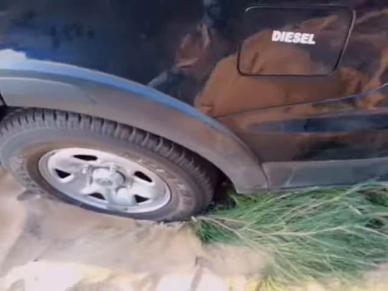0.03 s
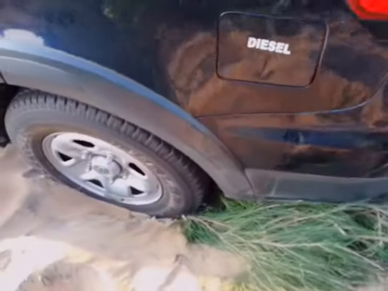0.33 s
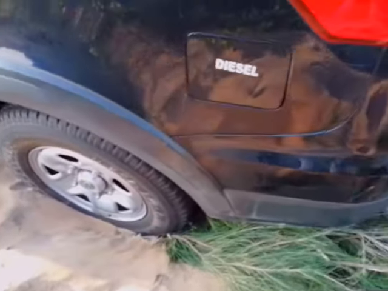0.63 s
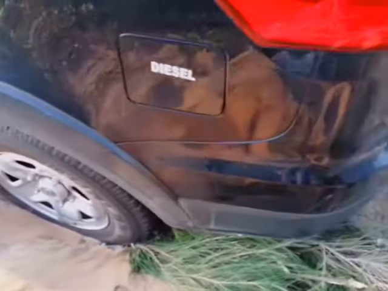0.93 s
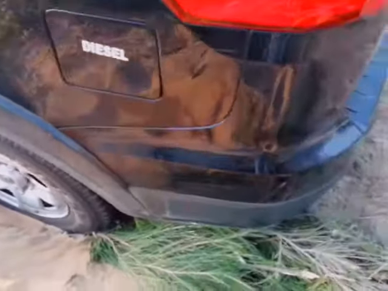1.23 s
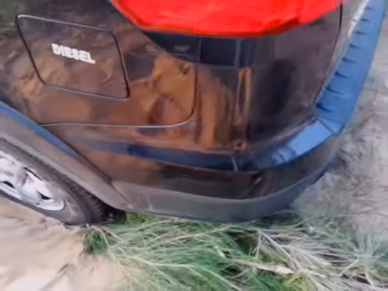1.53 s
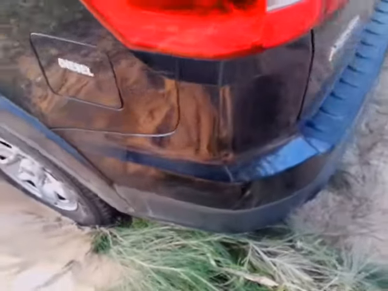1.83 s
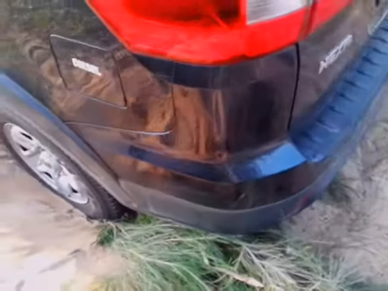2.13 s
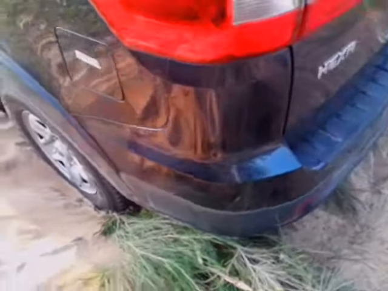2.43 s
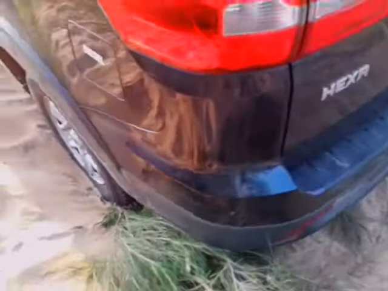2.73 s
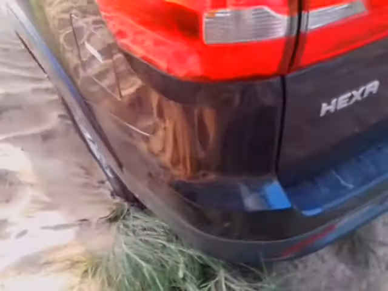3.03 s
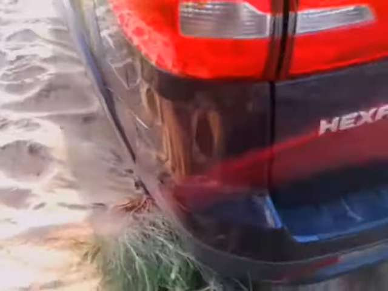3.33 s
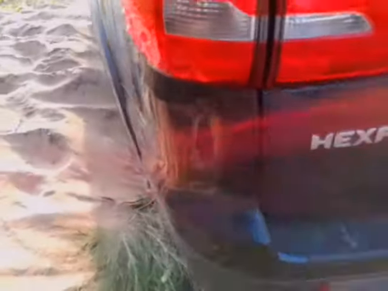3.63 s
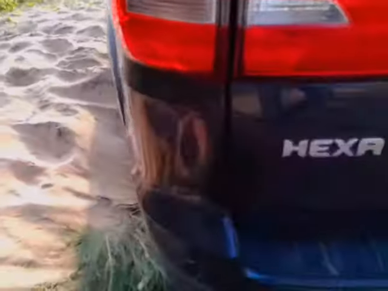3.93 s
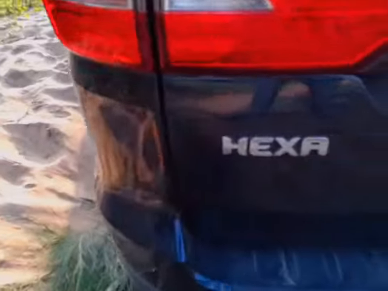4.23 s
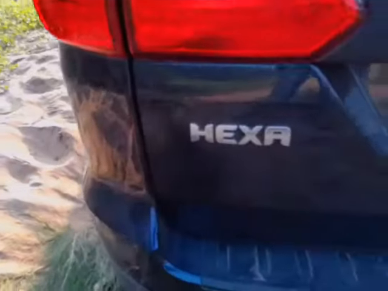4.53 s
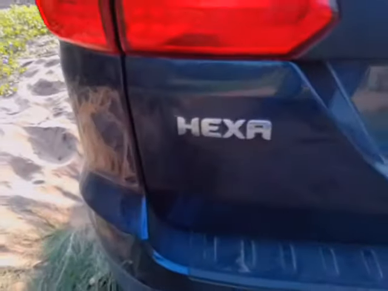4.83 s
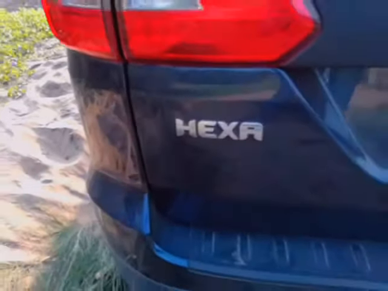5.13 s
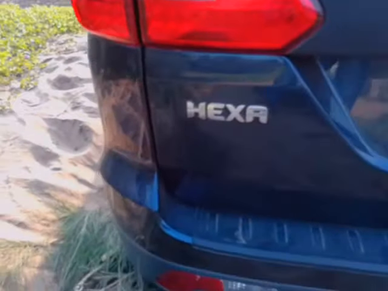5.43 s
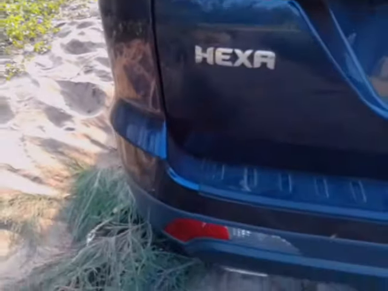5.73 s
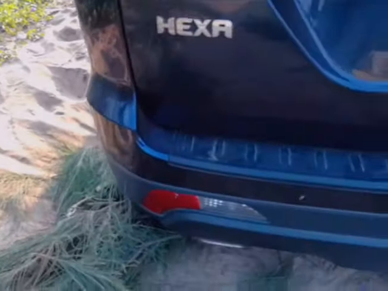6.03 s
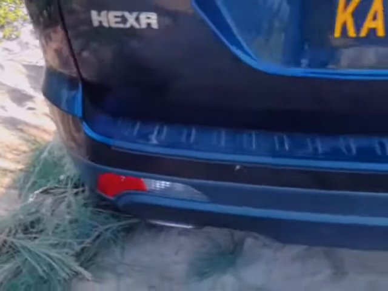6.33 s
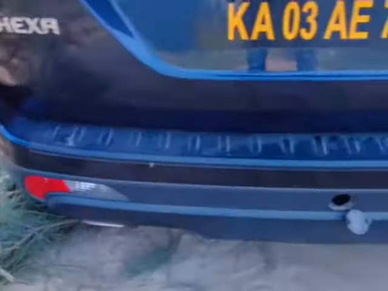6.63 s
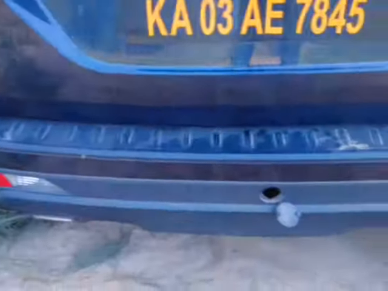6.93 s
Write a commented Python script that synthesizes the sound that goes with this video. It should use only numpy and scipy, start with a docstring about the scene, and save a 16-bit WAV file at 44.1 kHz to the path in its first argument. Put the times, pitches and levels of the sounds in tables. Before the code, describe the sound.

Wind buffets a hand-held microphone outdoors, rumbling and fluttering in uneven gusts with low pops, mostly on the left. It is strongest a little before halfway, eases, then swells again before dying down. Behind it, leaves hiss softly and high insects buzz. During the lull a small bird chatters faintly, while soft steps scuff sand and snap a few dry stems.

```python
"""On sand and grass beside a parked car, gusts buffet a hand-held phone carried slowly round it.
Turbulent pressure rumbles in the microphone ports and pops when eddies break over them; the hand adds
a deep rumble. Behind this, leaves hiss over a far roar, insect wings buzz in narrow resonant bands,
soft steps stir the sand and snap dry stems, distant birds call, and a small bird chatters in two
voices, one from each side of its syrinx."""
import sys
import numpy as np
from scipy import signal
from scipy.fft import rfft, irfft
from scipy.io import wavfile
from scipy.ndimage import uniform_filter1d

SR = 44100
rng = np.random.default_rng(int(sys.argv[2]) if len(sys.argv) > 2 else 0)


def pcm_store(signal):
    """Save signal as 16-bit PCM."""
    levels = np.round(np.clip(np.atleast_2d(signal), -1, 1) * 32767)
    wavfile.write(sys.argv[1], SR, levels.astype(np.int16).T)


N = 308700
TIME = np.arange(N) / SR
HZ = np.fft.rfftfreq(N, 1 / SR)

# Spectra are densities that set shape only; levels are relative, ahead of each function's own gains.
# Slow and fast turbulent pressure at a port: (frequency [Hz], level [dB])
RUMBLE_SPECTRUM = [(12, -41), (25, -1), (45, -3), (85, -0.5), (130, -1.5), (190, -6.5), (260, -15.5),
                   (400, -34), (800, -88)]
FLUTTER_SPECTRUM = [(90, -55), (170, -18), (230, -4.5), (320, -10.5), (450, -16.5), (700, -30), (1000, -54),
                    (1600, -63), (3000, -100)]
# Breeze between gusts: (time [s], rumble level [dB], flutter level [dB])
BREEZE = [(0, -42.5, -48), (.7, -48.5, -66), (1.1, -41.5, -57), (2.05, -45, -57), (3.2, -39, -52),
          (4.05, -47, -60), (4.5, -44.5, -63), (4.72, -48.5, -61), (6.25, -45, -60), (6.42, -52, -65),
          (7, -55.5, -65)]
# Gusts: (time [s], hold [s], rumble level [dB], flutter level [dB])
GUSTS = [(0, 0.053, -33, -34.5), (0.205, 0.022, -44, -64), (0.368, 0.0052, -35, -55),
         (0.428, 0.017, -36.5, -57), (0.576, 0.076, -34.5, -48.5), (0.762, 0.1, -35, -40.5),
         (1.018, 0.0077, -35, -65), (1.114, 0.016, -36.5, -58), (1.193, 0.066, -27, -34),
         (1.284, 0.14, -32, -42.5), (1.363, 0.0074, -26.5, -40), (1.47, 0.059, -24.5, -47),
         (1.558, 0.062, -29.5, -34.5), (1.83, 0.097, -41.5, -50.5), (2.171, 0.081, -34.5, -39.5),
         (2.296, 0.19, -29.5, -34), (2.472, 0.12, -26.5, -40), (2.628, 0.048, -21.5, -15),
         (2.727, 0.19, -23, -31), (2.924, 0.05, -29.5, -42), (3.005, 0.063, -30.5, -36.5),
         (3.09, 0.53, -39.5, -47), (3.542, 0.053, -42.5, -40), (3.825, 0.16, -40, -42),
         (4.106, 0.066, -41.5, -40.5), (4.345, 0.092, -38, -62), (4.55, 0.021, -54, -60),
         (4.791, 0.013, -29.5, -32.5), (4.868, 0.071, -28, -34.5), (4.992, 0.0081, -28, -34),
         (5.213, 0.1, -27, -33), (5.367, 0.026, -35.5, -41.5), (5.518, 0.022, -31.5, -43.5),
         (5.733, 0.045, -34.5, -37.5), (5.803, 0.089, -32, -33), (5.92, 0.097, -36.5, -39),
         (6.055, 0.035, -35, -51), (6.184, 0.095, -35.5, -43.5)]
# Share of the buffeting between the ports: (time [s], right minus left [dB])
PORT_BALANCE = [(0, -20), (.3, -8), (.8, -20), (1.28, -8), (1.38, 1), (1.48, -15), (2.05, -5.5), (2.3, -31),
                (2.7, -5), (2.88, -21), (3.14, 5.5), (3.4, -13), (4.15, -31), (4.5, -11), (5.0, -31),
                (6.2, -15), (6.5, -7), (7, -7)]
# Large eddies breaking over the left port: (time [s], peak level [dB], half-width [ms])
EDDIES = [(1.5039, -10.5, 0.44), (1.521, -14, 0.65), (1.5905, -20, 0.64), (2.2193, -25, 0.49),
          (2.2303, -9, 0.26), (2.2908, -17.5, 0.43), (2.3133, -17, 0.53), (2.363, -17, 0.47),
          (2.392, -19, 0.5), (2.4619, -27, 0.38), (2.5164, -23.5, 0.45), (2.562, -19.5, 0.88),
          (2.645, -9.5, 1.1), (2.668, -20, 0.48), (2.6744, -15, 0.4), (2.6794, -17, 0.42),
          (2.7356, -25.5, 0.27), (2.749, -13, 1.4), (2.798, -19, 0.56), (2.8311, -11, 0.69),
          (2.8495, -26, 0.49), (2.8678, -12.5, 0.54), (2.9017, -18, 0.67), (3.5399, -18.5, 0.36),
          (3.5699, -24, 0.47), (3.8385, -16.5, 0.62), (4.1257, -21.5, 0.49), (4.8036, -16.5, 0.53),
          (4.914, -20, 0.45), (5.223, -13.5, 0.46), (5.226, -12.5, 0.94), (5.261, -17, 0.34),
          (5.2631, -15, 0.45), (5.267, -23, 0.36), (5.278, -6.5, 0.42), (5.3, -17, 0.3),
          (5.3066, -10, 1.02), (5.3112, -11, 0.34), (5.317, -23, 0.23), (5.7955, -17.5, 0.44),
          (5.8074, -27, 0.37), (5.817, -13, 0.42), (5.8268, -13.5, 0.42), (5.8494, -18, 0.53),
          (5.8587, -8.5, 0.33), (5.9635, -23, 0.44)]
# Crackle around each eddy: (frequency [Hz], level [dB])
CRACKLE_SPECTRUM = [(200, -34), (500, 3), (800, -7), (1100, -25), (1500, -28), (2200, -47), (4000, -92)]
# Vibration from the hand: (frequency [Hz], level [dB])
HANDLING_SPECTRUM = [(10, -22), (28, -7), (45, 19), (70, 21), (110, -9), (200, -30)]
# Likeness of the diffuse field at the two ports: (frequency [Hz], coherence [0-1])
COHERENCE = [(50, 1), (250, 0.98), (600, 0.89), (1000, 0.37), (2000, 0.25), (3000, 0.2), (5000, 0.05),
             (7000, 0.068), (12000, 0.003)]
# Foliage in the breeze: (time [s], leaf level [dB], rustle level [dB], rustle left minus right [dB])
FOLIAGE = [(0, -51.5, -59.5, -8), (.3, -52, -60.5, -6), (.75, -54.5, -63, -6), (.95, -52.5, -58.5, -7.5),
           (1.55, -55, -61, -4), (1.85, -53, -57.5, -2), (2.22, -54.5, -59.5, -2), (2.38, -57.5, -61.5, -1),
           (2.85, -58, -65, 0), (3.6, -58, -65.5, 1), (4.5, -59, -66, 3), (4.9, -61.5, -71, 5),
           (5.3, -63.5, -72, 3), (5.7, -62, -69.5, 4), (7, -62, -68.5, 1)]
# Leaf hiss, high rustle and far roar: (frequency [Hz], level [dB])
LEAF_SPECTRUM = [(600, -2), (1000, -4.5), (1500, -4), (2000, 1), (2600, 0), (3300, -6), (4500, -11),
                 (7000, -15.5), (14000, -39)]
RUSTLE_SPECTRUM = [(1500, -20), (3000, 2.5), (4000, 3.5), (5200, -2.5), (6200, -1), (7200, -1.5),
                   (9500, -2.5), (11000, -10), (14000, -31)]
ROAR_SPECTRUM = [(20, -13), (100, 4), (250, 6), (450, -1.5), (750, 2.5), (1100, 5), (1600, 0),
                 (3000, -15.5), (8000, -34)]
# Strength of the far roar: (time [s], level [dB])
ROAR_LEVEL = [(0, -56.5), (2, -59), (3.5, -58.5), (5, -60), (7, -59.5)]
# Bearing of leaves and roar, and of the rustle: (frequency [Hz], left minus right [dB])
AIR_BALANCE = [(100, -11), (400, -0.5), (800, 7.5), (1300, -2.5), (2200, -6.5), (3200, -3.5), (4500, -3.5),
               (12000, 7)]
RUSTLE_BALANCE = [(3000, -5.5), (4500, 2), (6500, -6), (9500, 7), (13000, -6)]
# Wing resonances of the insect chorus: (frequency [Hz], level [dB])
CHORUS_SPECTRUM = [(5000, -54), (5700, -35), (6150, -13), (6700, -52), (7200, -16), (7600, -1), (8050, 1),
                   (8500, -2), (9000, -13), (10000, -29), (13000, -32)]
# Strength of the chorus: (time [s], level [dB])
CHORUS_LEVEL = [(0, -63.5), (1.5, -65.5), (2, -62), (2.85, -65.5), (3.2, -59.5), (3.7, -58.5), (4.3, -61.5),
                (4.7, -62.5), (5.15, -63), (5.9, -65.5), (7, -66)]
# Sand and dry grass underfoot:
# (time [s], duration [s], level [dB], centre [Hz], half-width [octaves], left minus right [dB])
SCUFFS = [(0.895, 0.48, -55, 5730, 0.41, -14), (1.658, 0.42, -61.5, 8900, 0.21, 0),
          (2.4, 0.04, -55, 8750, 0.23, -1), (3.674, 0.15, -64, 10000, 0.36, -1),
          (4.046, 0.088, -54, 1190, 0.81, -3), (4.128, 0.06, -65, 10500, 0.25, 1),
          (5.543, 0.35, -58, 8300, 1, -1), (6.078, 0.25, -66, 10000, 0.4, 1),
          (6.341, 0.074, -51, 1560, 0.57, -3), (6.466, 0.085, -63, 10500, 0.25, 3),
          (6.566, 0.038, -58, 7540, 1, 3), (6.571, 0.1, -60, 9800, .3, 3)]
# Distant bird calls: (time [s], duration [s], frequency [Hz], level [dB], blur [Hz])
FAR_CALLS = [(0.897, 0.043, 970, -51, 130), (5.949, 0.092, 2180, -58.5, 190), (6.728, 0.079, 1234, -59, 80)]
# Dry stems breaking: (time [s], level [dB], left minus right [dB])
SNAPS = [(2.4154, -43, -3.5), (4.0485, -39.5, 2), (4.055, -47, 0), (4.099, -50, 0), (4.15, -53, 1.5),
         (4.5355, -48, -2), (4.6264, -51, 0), (6.522, -50, 2.5), (6.57, -46.5, 4.5), (6.6294, -47, 4.5)]
# Crack of a stem: (frequency [Hz], level [dB])
SNAP_SPECTRUM = [(1500, -35), (4000, -14), (6500, 0), (9000, 4), (11000, -5), (12500, -17), (14000, -28)]
# Course of the nearer insect's chirps: (time [s], level [dB], frequency [Hz])
CHIRP_CONTOUR = [(2.83, -62, 7520), (3.1, -63, 7700), (3.4, -59, 7540), (3.719, -60, 7800),
                 (4.1, -57, 7800), (4.5, -63, 7760)]
# Bird chatter that climbs, then drops and fades: (time [s], level [dB], top frequency [Hz])
CHATTER_CONTOUR = [(2.979, -62, 3300), (3.24, -58, 3450), (3.37, -54.5, 3600), (3.88, -54, 3950),
                   (4.01, -56, 3400), (4.14, -60, 3300), (4.27, -60, 3300)]
# Bursts from a lower-pitched insect: (time [s], duration [s], level [dB])
RASPS = [(3.08, 0.46, -68), (3.95, 0.41, -74), (4.9, .4, -77)]


def gain_of(db):
    """Amplitude ratio: a factor of ten for every 20 dB."""
    return 10 ** (np.asarray(db) / 20)


def unit_rms(x):
    """Normalisation to unit mean power."""
    return x / np.sqrt(np.mean(x ** 2) + 1e-20)


def over_frequency(rows):
    """Interpolation of a table along a logarithmic frequency axis."""
    hz, value = np.transpose(rows)
    return np.interp(np.log(HZ + 1), np.log(hz + 1), value)


def over_time(rows):
    """Linear interpolation of each column of a table in time."""
    times, *columns = np.transpose(rows)
    return [np.interp(TIME, times, column) for column in columns]


def add(mix, start_s, sound):
    """Superposition of a sound on the mix."""
    part = mix[..., max(round(start_s * SR), 0):][..., :sound.shape[-1]]
    part += sound[..., :part.shape[-1]]


def noise(spectrum):
    """Spectral shaping of white noise gives steady coloured noise."""
    white = rfft(rng.standard_normal(N))
    return unit_rms(irfft(white * gain_of(over_frequency(spectrum)), N))


def drift(hz):
    """Low-pass filtering of noise gives random wandering up to about the given rate."""
    white = rfft(rng.standard_normal(N))
    return unit_rms(irfft(white * np.exp(-(HZ / hz) ** 2), N))


def panned(db):
    """A level difference, left minus right, split evenly between the channels."""
    return gain_of(np.array([[.5], [-.5]]) * db)


def port_lag(delay_ms=0.44):
    """The delay between the ports turns phase in proportion to frequency."""
    return np.exp(-2j * np.pi * HZ * delay_ms / 1e3)


def airflow(attack_s=0.016, release_s=0.017):
    """Incoherent powers add: gusts on the breeze give the rumble and flutter levels in dB."""
    power = gain_of(over_time(BREEZE)) ** 2
    for start, hold, rumble_db, flutter_db in GUSTS:
        rise = np.clip(1 + (TIME - start) / attack_s, 0, 1)
        fall = np.exp(-np.clip((TIME - start - hold) / release_s, 0, 20))
        power += gain_of([[rumble_db], [flutter_db]]) ** 2 * (rise * fall) ** 2
    return 10 * np.log10(power)


def turbulence(spectrum, samples):
    """Random pressure divided by its running rms holds a steady strength."""
    pressure = noise(spectrum)
    power = uniform_filter1d(uniform_filter1d(pressure ** 2, samples), samples)
    return pressure / np.sqrt(power + 1e-6)


def buffet(rumble_db, flutter_db, stall_db=-28, calm_db=-52):
    """Intermittent turbulence: puffs smooth out in a lull; flutter saturates as eddies break off."""
    unrest = 1 / (1 + gain_of(2 * (calm_db - rumble_db)) ** 2)
    lumps_db = 13 * unrest * np.tanh(drift(hz=88) / 2)
    puffs_db = 2.5 * unrest * np.tanh(drift(hz=14))
    rumble = unit_rms(turbulence(RUMBLE_SPECTRUM, samples=1100) * gain_of(.5 * lumps_db + puffs_db))
    flutter = unit_rms(turbulence(FLUTTER_SPECTRUM, samples=900) * gain_of(.92 * lumps_db + puffs_db))
    saturation = np.sqrt(1 + gain_of(flutter_db - stall_db) ** 2)
    return gain_of(rumble_db + 1) * rumble + gain_of(flutter_db - 1) / saturation * flutter


def tearing(flutter_db, full_db=-32, per_s=170, width_ms=0.54):
    """Shot noise of small eddies, which grow faster than the flutter that sheds them, up to a limit."""
    clicks = (rng.random(N) < per_s / SR) * rng.choice([-1, 1], N)
    u = np.arange(-200, 201) / SR * 1e3 / width_ms
    pulse = (1 + u - u ** 2) * np.exp(-u ** 2 / 2)
    swirl = unit_rms(signal.oaconvolve(clicks, pulse, "same"))
    drive_db = np.minimum(flutter_db, full_db)
    return swirl * gain_of(drive_db + 0.47 * (drive_db - full_db))


def lesser_eddies(flutter_db, per_s=30, onset_db=-31, width_ms=0.62, trials=400):
    """Random vortex shedding, more frequent in strong flutter, as rows like EDDIES."""
    rows = []
    for when, chance, size, width in rng.random((trials, 4)):
        rate = per_s / (1 + gain_of(onset_db - flutter_db[int(when * N)]) ** 4)
        if chance < rate * N / SR / trials:
            peak_db = -25 + 6 * size
            rows.append((when * N / SR, peak_db, width_ms * 2 ** (width - .5)))
    return rows


def eddies(flutter_db, skew=0.45, rebound=0.55):
    """A passing vortex makes a pressure pulse at the port: suction, push and rebound."""
    out = np.zeros(N)
    t = np.arange(-300, 301) / SR
    for centre, db, width_ms in EDDIES + lesser_eddies(flutter_db):
        u = t * 1e3 / width_ms
        pulse = (1 + skew * u - rebound * u ** 2) * np.exp(-u ** 2 / 2)
        add(out, centre + t[0], gain_of(db) * pulse / pulse.max())
    return out


def wind(crosstalk_hz=680, crackle_db=-15, tear_db=-12):
    """Turbulent pressure on each port also reaches the other channel, delayed and low-passed."""
    ratio = gain_of(over_time(PORT_BALANCE)[0])
    rumble_db, flutter_db = airflow()
    left = buffet(rumble_db, flutter_db)
    right = ratio * buffet(rumble_db, flutter_db)
    ports = np.array([left, right]) / np.sqrt(1 + ratio ** 2)
    pops = eddies(flutter_db)
    pop_envelope = np.sqrt(abs(uniform_filter1d(uniform_filter1d(pops ** 2, 700), 400)))
    crackle = unit_rms(noise(CRACKLE_SPECTRUM) * gain_of(1.6 * drift(hz=150)))
    ports[0] += pops + gain_of(crackle_db) * pop_envelope * crackle
    ports[0] += gain_of(tear_db) * tearing(flutter_db)
    crosstalk = rfft(ports[::-1]) * port_lag() / (1 + 1j * HZ / crosstalk_hz) ** 2
    return ports + irfft(crosstalk, N)


def handling(level_db=-56):
    """Structure-borne sound: the hand shakes the phone, a deep rumble alike in both channels."""
    return gain_of(level_db) * noise(HANDLING_SPECTRUM)


def diffuse(spectrum, balance_db):
    """A diffuse field arrives from all round, so the ports lose coherence as frequency rises."""
    left, independent = rfft(rng.standard_normal((2, N)))
    coherence = over_frequency(COHERENCE)
    right = coherence * left * port_lag() + np.sqrt(1 - coherence ** 2) * independent
    colour = panned(balance_db) * gain_of(over_frequency(spectrum))
    pair = irfft(np.array([left, right]) * colour, N)
    return pair / pair.mean(0).std()


def trees(flicker_db=0.85, sway=0.75):
    """Many leaves sum to diffuse noise over a far roar; the rustle shifts as the phone turns."""
    leaves_db, rustle_db, side_db = over_time(FOLIAGE)
    balance_db = over_frequency(AIR_BALANCE)
    leaves = diffuse(LEAF_SPECTRUM, balance_db) * gain_of(leaves_db + flicker_db * drift(hz=9.3))
    rustle = diffuse(RUSTLE_SPECTRUM, over_frequency(RUSTLE_BALANCE)) * panned(sway * side_db)
    rustle *= gain_of(rustle_db + 1.5 + flicker_db * drift(hz=28))
    roar = diffuse(ROAR_SPECTRUM, balance_db) * gain_of(over_time(ROAR_LEVEL)[0])
    return leaves + rustle + roar


def phase_of(hz):
    """Phase is the time integral of frequency."""
    return 2 * np.pi * np.cumsum(hz) / SR


def insects(side_db=-6, throb_hz=4.5, throb_db=1.9, stroke_hz=108, stroke_depth=0.16):
    """Wing strokes modulate the amplitude of a high, throbbing chorus and of two single insects."""
    throb = np.sin(phase_of(throb_hz * (1 + 0.18 * drift(hz=2.8))))
    strokes = 1 + stroke_depth * np.sin(phase_of(stroke_hz * (1 + 0.0526 * drift(hz=9.7))))
    chorus = diffuse(CHORUS_SPECTRUM, side_db) * gain_of(over_time(CHORUS_LEVEL)[0] + throb_db * throb)
    return (chorus + chirps() + rasps(side_db)) * strokes


def steps(grain_db=3, dull_hz=11500):
    """Tiny impacts of sand grains and brushed grass merge into short showers of band-limited noise."""
    out = np.zeros((2, N))
    for start, length, db, centre_hz, octaves, side_db in SCUFFS:
        count = round(length * SR)
        grains, size = rng.standard_normal((2, 2, count))
        hz = np.fft.rfftfreq(count, 1 / SR) + 1
        colour = np.exp(-.5 * (np.log2(hz / centre_hz) / octaves) ** 2) / (1 + (hz / dull_hz) ** 8)
        shower = unit_rms(irfft(rfft(grains * gain_of(grain_db * size)) * colour, count))
        add(out, start, gain_of(db) * shower * signal.windows.hann(count) * panned(side_db))
    return out


def outdoors(direct, t60_s, wet_db):
    """Scattering from trees and ground adds a short, exponentially decaying tail."""
    t = np.arange(SR // 2) / SR
    tail = rng.standard_normal((2, len(t))) * gain_of(-60 * t / t60_s) * (t > .004)
    tail /= np.linalg.norm(tail, axis=1, keepdims=True)
    return direct + gain_of(wet_db) * signal.fftconvolve(direct[None], tail, axes=1)[:, :N]


def far_calls():
    """Spectral broadening: distance blurs each plain bird call into a narrow band."""
    out = np.zeros(N)
    for start, length, hz, db, blur_hz in FAR_CALLS:
        t = TIME[:round(length * SR)]
        blur = drift(blur_hz) + 1j * drift(blur_hz)
        call = unit_rms((blur[:len(t)] * np.exp(2j * np.pi * hz * t)).real)
        add(out, start, gain_of(db) * signal.windows.hann(len(t)) * call)
    return outdoors(out, t60_s=.18, wet_db=-14)


def snaps(tick_ms=0.67, shiver_db=-15, shiver_ms=6):
    """Brittle fracture of dry stems: a sharp tick, then a damped shiver of the tuft."""
    envelope = np.zeros((2, N))
    ms = 1e3 * TIME[:SR // 20]
    decay = np.exp(-ms / tick_ms) + gain_of(shiver_db) * np.exp(-ms / shiver_ms)
    for start, db, side_db in SNAPS:
        add(envelope, start, gain_of(db) * decay * panned(side_db))
    return envelope * np.array([noise(SNAP_SPECTRUM), noise(SNAP_SPECTRUM)])


def chirps(side_db=-5, count=13, period_s=.139, length_s=0.105, width_hz=520):
    """Stridulation: a nearer insect's evenly spaced scrapes excite one wing resonance."""
    db, hz = over_time(CHIRP_CONTOUR)
    first_s = CHIRP_CONTOUR[0][0] - length_s / 2
    gate = np.zeros(N)
    for k in range(count):
        add(gate, first_s + k * period_s, signal.windows.tukey(round(length_s * SR), .7))
    scrape = np.array([drift(width_hz) + 1j * drift(width_hz) for _ in range(2)])
    resonance = (scrape * np.exp(1j * phase_of(hz))).real
    return resonance * gate * gain_of(db) * panned(side_db)


def chatter(count=11, period_s=.129, half_note_s=.015, flick_s=.012, break_s=.008, rest_ratio=.62):
    """Frequency modulation: both sides of the syrinx flick up and down, breaking off at the top."""
    times, levels, pitches = np.transpose(CHATTER_CONTOUR)
    centres = times[0] + period_s * np.arange(count)
    out = np.zeros(N)
    t = np.arange(-2200, 2201) / SR
    envelope = np.exp(-.5 * (t / half_note_s) ** 2) * (1 - np.exp(-(t / break_s) ** 2))
    flick = rest_ratio + (1 - rest_ratio) * np.exp(-(t / flick_s) ** 2)
    for pitch_ratio, voice_db in [(1, 4.5), (.8, -2.5)]:
        waver = 1 + .04 * drift(hz=270)  # hoarseness
        for centre in centres:
            top_hz = pitch_ratio * np.interp(centre, times, pitches)
            hz = top_hz * flick * waver[round(centre * SR):][:len(t)]
            gain = gain_of(np.interp(centre, times, levels) + voice_db)
            add(out, centre + t[0], gain * envelope * np.sin(phase_of(hz)))
    return outdoors(out, t60_s=0.31, wet_db=-0.5) * panned(db=-7)


def rasps(side_db, centre_hz=6150, width_hz=450):
    """Random amplitude modulation spreads another insect's lower tone into a rasp."""
    out = np.zeros((2, N))
    band = unit_rms(drift(width_hz) * np.sin(2 * np.pi * centre_hz * TIME)) * panned(side_db)
    for start, length, db in RASPS:
        burst = band[:, round(start * SR):][:, :round(length * SR)]
        add(out, start, gain_of(db) * burst * signal.windows.tukey(burst.shape[1], .6))
    return out


def scene(self_noise_db=-83):
    """Superposition of wind, handling, the quiet countryside and the microphone's own hiss."""
    hiss = gain_of(self_noise_db) * rng.standard_normal((2, N))
    return wind() + handling() + trees() + insects() + steps() + far_calls() + snaps() + chatter() + hiss


def record(dry, bass_hz=16, ceiling=0.55, treble_cutoff_hz=14300):
    """Bass roll-off and soft saturation of the hardest blows; the highest treble is then cut off."""
    thinned = irfft(rfft(dry) * HZ ** 2 / (HZ ** 2 + bass_hz ** 2), N)
    rounded = ceiling * np.tanh(thinned / ceiling)
    lowpass = signal.firwin(511, treble_cutoff_hz, window=("kaiser", 9), fs=SR)
    return signal.oaconvolve(rounded, lowpass[None], "same")


dry = scene()
out = record(dry)
pcm_store(out)
```